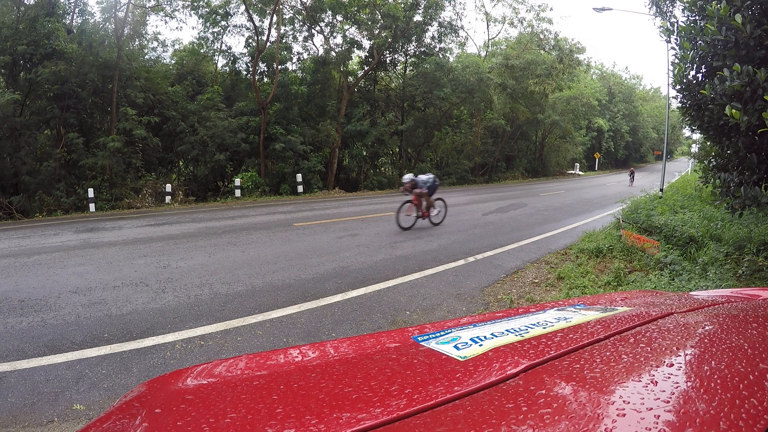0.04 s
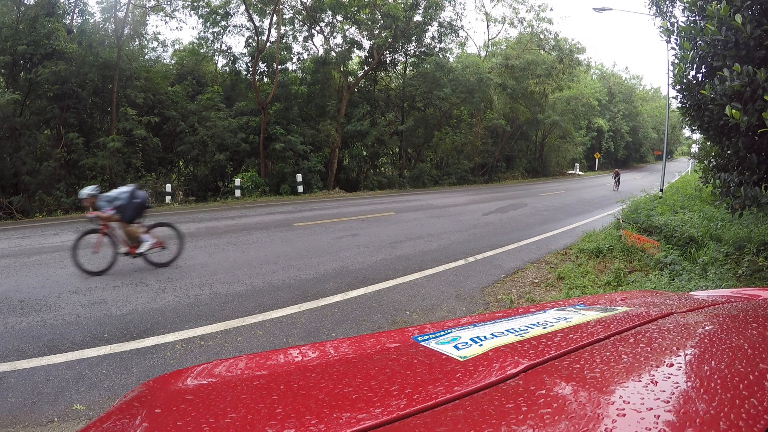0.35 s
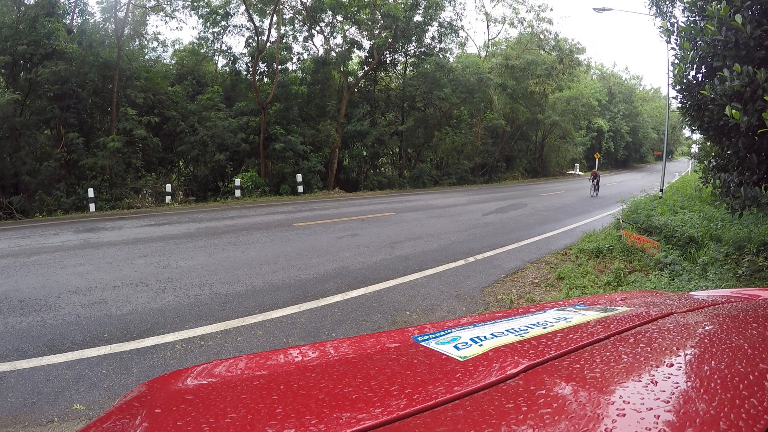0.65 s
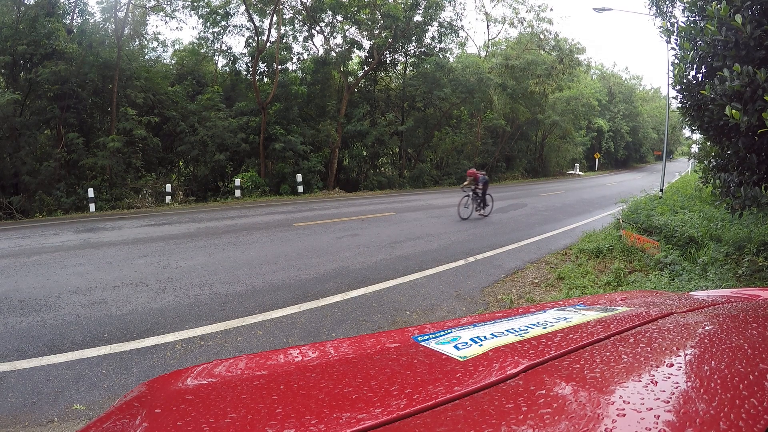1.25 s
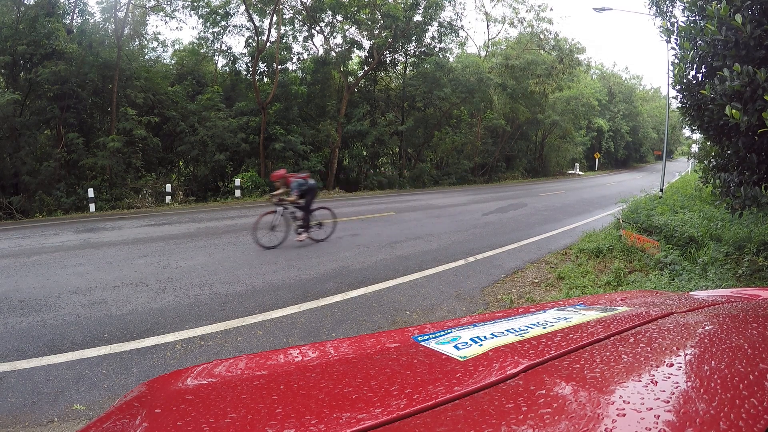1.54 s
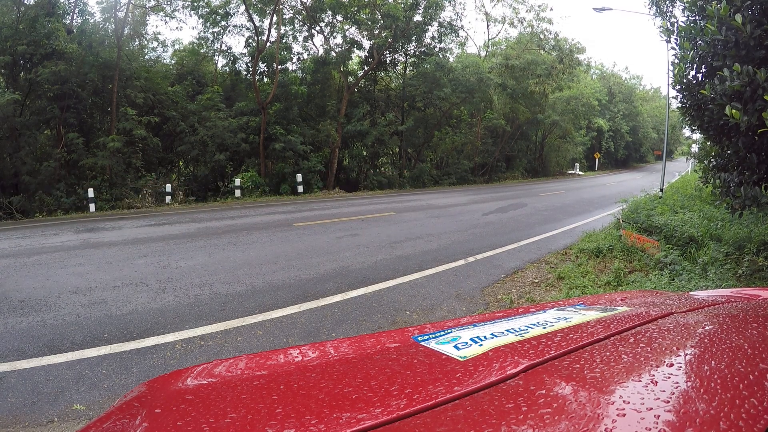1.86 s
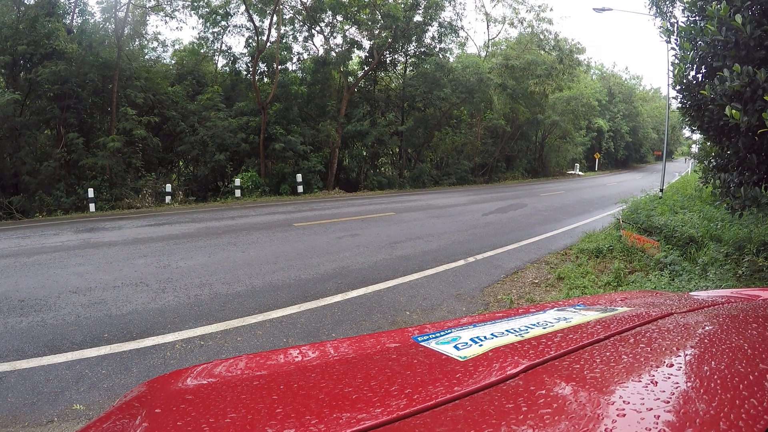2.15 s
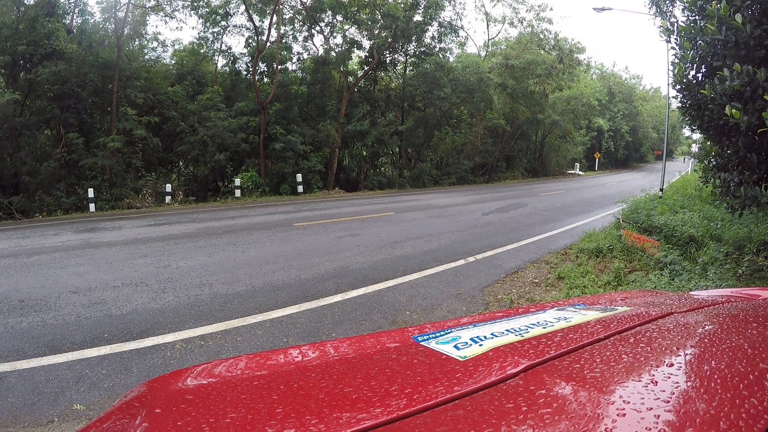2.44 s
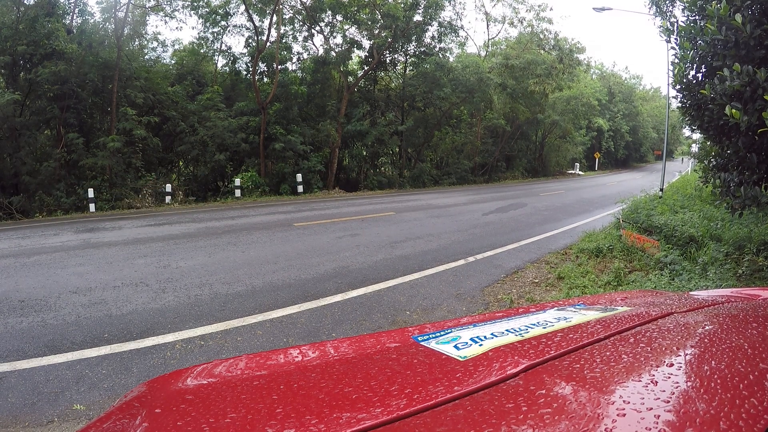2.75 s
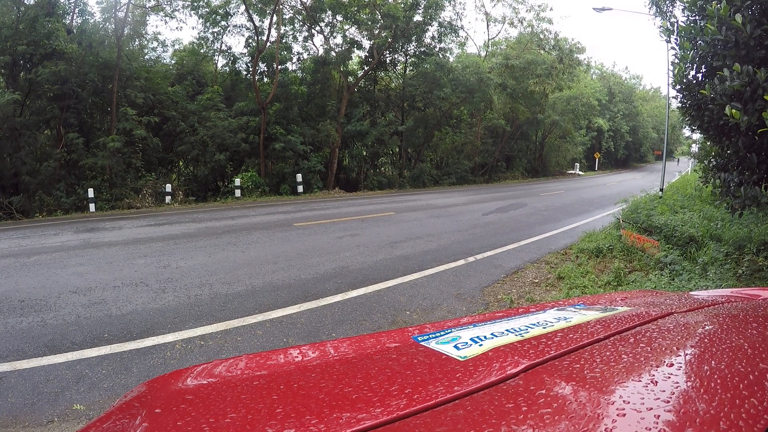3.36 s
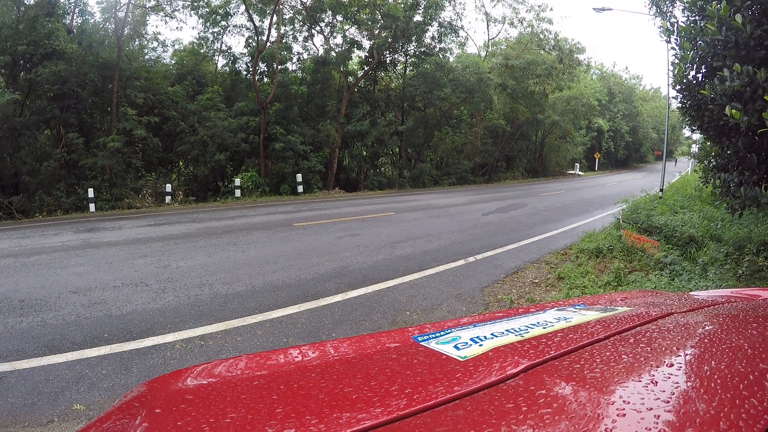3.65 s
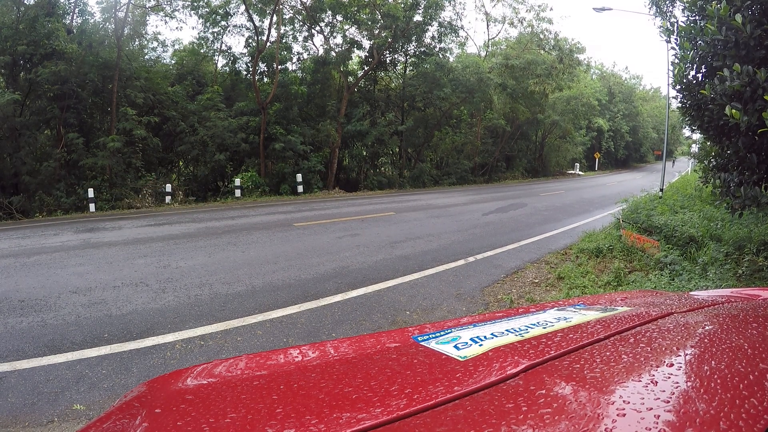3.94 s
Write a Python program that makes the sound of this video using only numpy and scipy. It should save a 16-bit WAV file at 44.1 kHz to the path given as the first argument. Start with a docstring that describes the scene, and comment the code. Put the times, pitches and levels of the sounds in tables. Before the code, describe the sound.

Two bicycles pass close by on a damp forest road, at about 0.5 and 1.9 seconds, each tyre hiss swelling, then fading with a hollow whoosh. High insects drone throughout over a low rumble. Dull bumps sound at the very start and more softly around 2.3 and 2.8 seconds, with a few faint knocks. A small bird chirps faintly near 2.5 and 3 seconds; the insects continue until 4.

```python
"""Two bicycles on a forest road

Two racing bicycles ride past a camera on a parked car, on a damp forest road. Their tyres hiss
on the way in, fizz alongside and roar hollowly as they leave. Insects drone in the trees and a
small bird calls twice. Dull bumps and faint knocks sound over a low rumble."""
import sys
import numpy as np
from scipy import signal
from scipy.fft import rfft, irfft
from scipy.io import wavfile
from scipy.ndimage import uniform_filter1d

SR = 44100
rng = np.random.default_rng(int(sys.argv[2]) if len(sys.argv) > 2 else 0)


def store_wav(level_fs):
    """Save 16-bit WAV to argv[1]."""
    pcm = np.round(np.clip(np.atleast_2d(level_fs), -1, 1) * 32767)
    wavfile.write(sys.argv[1], SR, pcm.T.astype(np.int16))


N = 176400

# Each bicycle's basic tyre noise at its nearest: pitch_hz, level_db_per_hz
FIRST_TYRE_NOISE = [(150, -102), (350, -96.5), (700, -93.5), (1100, -84.5), (1700, -90), (2400, -82.5),
                    (3400, -90), (5000, -93.5), (8000, -103), (10700, -99.5), (12200, -109), (15000, -106)]
SECOND_TYRE_NOISE = [(150, -102), (350, -103), (700, -89.5), (1100, -94.5), (1500, -93), (2400, -87),
                     (3400, -88.5), (5000, -95.5), (8000, -96), (10200, -93), (12000, -99), (13200, -97),
                     (15000, -102)]
# The two rides. An angle is negative on the way in and zero alongside:
# nearest_s, speed_m_per_s, distance_m, band_strength, roar_angle_deg, roar_spread_deg, roar_db
RIDES = [(.53, 13.2, 5.07, 1.18, 28.7, 9.3, 6.5), (1.87, 11.34, 4.15, 1.13, 20, 20.6, 3.5)]
# Tyre bands that stand out in one direction (band_strength multiplies the boost):
# angle_deg, spread_deg, pitch_hz, width_hz, boost_db
TYRE_BANDS = [(-35, 23.5, 3740, 460, 9.5), (-42, 34, 2140, 40, 9), (-27, 33, 2640, 79, 6),
              (56, 7, 1780, 210, 6), (36, 16, 1260, 460, 0), (3, 21, 4960, 200, 8), (5, 18, 6800, 450, 7.5),
              (-26, 6, 9050, 820, 8.5), (-35, 7.7, 12200, 310, 12.5), (4.5, 16, 11720, 550, 10.5),
              (12, 9.8, 10150, 420, 9), (-15, 16, 14000, 900, 4)]
# The insect chorus: pitch_hz, level_db_per_hz
CHORUS_NOISE = [(4500, -118), (4640, -100), (4715, -80), (4760, -91), (4810, -80), (4900, -84.5),
                (5000, -93.5), (5110, -101), (5250, -118)]
# How the chorus swells and sinks: time_s, gain_db
CHORUS_SWELL = [(0, -0.53), (.9, -1), (1.3, 1), (1.6, -1), (2.15, -1.3), (2.4, 0.42), (2.6, -0.78),
                (3.15, 1), (4, -1.2)]
# Thin, steady insect whines: pitch_hz, width_hz, level_db
INSECT_WHINES = [(10405, 1.5, -75), (8538, 90, -88)]
# Bird calls: start_s, length_s, from_hz, to_hz, level_db
BIRD_CALLS = [(2.535, .05, 6150, 7300, -62), (3.03, .11, 7100, 6300, -68)]
# Dull bumps (a fade is the time to drop 60 dB):
# start_s, deep_hz, deep_db, deep_fade_s, upper_hz, upper_db, upper_fade_s
DULL_BUMPS = [(.088, 54.6, -25.5, 0.18, 179, -41.5, 0.13), (0.155, 51.6, -34.5, 0.66, 176, -41.5, 0.12),
              (2.291, 21.96, -40, 2.54, 98, -49, 0.54), (2.809, 24.6, -52.5, 0.99, 99.5, -54, 0.69)]
# Faint hollow knocks: start_s, pitch_hz, level_db
HOLLOW_KNOCKS = [(.105, 556, -48), (.174, 544, -51), (.763, 1820, -43.5), (2.839, 1000, -54.5)]
# The low drone: pitch_hz, level_db_per_hz
DRONE_NOISE = [(60, -100), (110, -90), (145, -76), (165, -83.5), (188, -73.5), (205, -78.5), (230, -94),
               (320, -106)]
# How the drone swells and sinks: time_s, gain_db
DRONE_SWELL = [(.1, 4), (0.398, -1), (.85, 0), (1.048, -8), (1.2, 0.5), (1.38, 2), (1.52, 1.5), (2.0, -3),
               (2.22, -1.5), (2.36, -12), (3.0, -12), (4, -18.5)]
# Still air and far surroundings: pitch_hz, level_db_per_hz
AIR_NOISE = [(10, -75.5), (24, -77), (32, -72), (50, -74.5), (76, -91.5), (100, -86.5), (170, -87),
             (250, -97.5), (450, -99.5), (900, -101), (1800, -101), (3500, -101), (4400, -103),
             (5800, -103), (7000, -107.5), (9000, -110), (11200, -109.5), (12400, -113), (13300, -110.5),
             (15000, -115)]
# Pitches that the camera housing lifts or dulls: pitch_hz, gain_db
HOUSING_COLOUR = [(300, 0.5), (570, 1), (670, -4.5), (780, 2), (910, -2), (1000, 3.5), (1180, -1.5),
                  (1310, 2.5), (1400, -5.5), (1460, -2), (1540, -3.5), (1620, 6), (1750, 6.5), (1870, 3),
                  (2010, 6.5), (2110, 1.5), (2250, 0), (2390, 2), (2520, -0.5), (3000, -4.5), (3300, 2.5),
                  (3500, 0), (3780, 6), (4200, -3.5), (4570, 0.5), (4800, -1), (5350, -2.5), (5800, -9),
                  (6030, -0.5), (6220, -4.5), (6900, -1), (8200, -4), (9500, -2), (15000, -3)]

SOUND_M_PER_S, TOP_HZ = 343, 15250
# Noise is shaped on a grid of pitches and short time steps (frames).
GRID_HZ = np.fft.rfftfreq(1024, 1 / SR)
FRAME_S = np.arange(N // 256 + 5)[:, None] * 256 / SR


def bicycle(tyre_noise, nearest_s, speed, distance, band_strength, roar_angle, roar_spread, roar_db):
    """Gritty tyre noise that is louder when near, drops in pitch as it passes and changes with angle."""
    along_m = speed * (FRAME_S - nearest_s)
    away_m = np.hypot(along_m, distance)
    angle = np.degrees(np.arctan2(along_m, distance))
    # Doppler effect: the pitch the tyres must send for each pitch we hear.
    sent_hz = GRID_HZ * (1 + speed / SOUND_M_PER_S * along_m / away_m)

    def band(towards, spread, hz, width_hz, db):
        """A range of pitches that is louder in one direction."""
        return db * np.exp(-.5 * (((angle - towards) / spread) ** 2 + ((sent_hz - hz) / width_hz) ** 2))

    loss_db = 23.5 + 5.5 * GRID_HZ / TOP_HZ  # per tenfold distance; treble loses more
    level_db = at_pitch(tyre_noise, sent_hz) - np.log10(away_m / distance) * loss_db
    level_db += band_strength * sum(band(*row) for row in TYRE_BANDS)
    level_db += band(roar_angle, roar_spread, hz=1850, width_hz=250, db=roar_db)
    level_db += 1.66 * flicker(frames=14, pitches=9) + 1.87 * flicker(frames=40, pitches=2)
    grit_db = unit_level(uniform_filter1d(rng.standard_normal(N), size=90))
    return shaped_noise(level_db) * gain(grit_db)


def insects():
    """Many far insects merge into one narrow band; single ones whine above it."""
    chorus = shaped_noise(at_pitch(CHORUS_NOISE, GRID_HZ) + at_time(CHORUS_SWELL, FRAME_S))
    whines = sum(np.sqrt(2) * gain(db) * tone(np.full(N, hz), width) for hz, width, db in INSECT_WHINES)
    return chorus + whines


def bird(echo_fade_s=.45, echo_db=-4):
    """Thin gliding calls, smeared by their echo from the trees."""
    calls = np.zeros(N)
    for start_s, length_s, from_hz, to_hz, db in BIRD_CALLS:
        progress = np.linspace(0, 1, round(length_s * SR))
        swell = np.sqrt(abs(np.sin(np.pi * progress)))
        glide_hz = from_hz + (to_hz - from_hz) * progress ** 2
        add(calls, start_s, gain(db) * swell * tone(glide_hz, width_hz=900))
    t = np.arange(SR // 2) / SR
    echo = rng.standard_normal(len(t)) * gain(-60 * t / echo_fade_s)
    return calls + gain(echo_db) * signal.fftconvolve(calls, echo / np.linalg.norm(echo))[:N]


def bumps(rise_cycles=1.7):
    """Soft blows, each with a deep and an upper ring that swell quickly and die away."""
    out, t = np.zeros(N), np.arange(SR) / SR
    for start_s, *rings in DULL_BUMPS:
        for hz, db, fade_s in (rings[:3], rings[3:]):
            loudness = np.minimum(t * hz / rise_cycles, 1) * gain(db - 60 * t / fade_s)
            add(out, start_s, loudness * tone(np.full(len(t), hz), width_hz=.043 * hz))
    return out


def knocks(rise_s=.0046, fade_s=.079):
    """Short, rough rings at middle pitches."""
    out, t = np.zeros(N), np.arange(SR // 4) / SR
    for start_s, hz, db in HOLLOW_KNOCKS:
        loudness = np.minimum(t / rise_s, 1) * gain(db - 60 * t / fade_s)
        add(out, start_s, loudness * tone(np.full(len(t), hz), width_hz=180))
    return out


def drone():
    """A narrow band of low noise that swells and sinks."""
    hum = colour(rng.standard_normal(N), DRONE_NOISE) * np.sqrt(SR / 2)
    return hum * gain(at_time(DRONE_SWELL, np.arange(N) / SR))


def air():
    """The far surroundings blend into a soft hiss and a low rumble."""
    return shaped_noise(at_pitch(AIR_NOISE, GRID_HZ) + .73 * flicker(frames=16, pitches=10))


def gain(db):
    """Turns decibels into a multiplier."""
    return 10 ** (np.asarray(db) / 20)


def unit_level(x):
    """Scales a signal so its typical size (rms) is 1."""
    return x / np.sqrt(np.mean(x ** 2) + 1e-20)


def at_pitch(table, hz):
    """Reads between a table's rows, giving each octave equal room."""
    pitches, levels = np.transpose(table)
    return np.interp(np.log(hz + 1), np.log(pitches + 1), levels)


def at_time(table, time_s):
    """Reads a table's level at the given times."""
    return np.interp(time_s, *np.transpose(table))


def colour(sound, table):
    """Turns each pitch up or down as the table says."""
    return irfft(rfft(sound) * gain(at_pitch(table, np.fft.rfftfreq(N, 1 / SR))), N)


def add(mix, start_s, sound):
    """Mixes a sound in at its start time."""
    part = mix[max(round(start_s * SR), 0):][:len(sound)]
    part += sound[:len(part)]


def flicker(frames, pitches):
    """Random louder and softer patches of the given size on the grid."""
    specks = rng.standard_normal((len(FRAME_S), len(GRID_HZ)))
    streaks = uniform_filter1d(specks, frames, axis=0)
    return unit_level(uniform_filter1d(streaks, pitches, axis=1))


def shaped_noise(db_per_hz):
    """Noise with the given level at each point of the grid."""
    white = rng.standard_normal(N + 2048) * np.sqrt(SR / 2)
    grid = signal.stft(white, nperseg=1024, noverlap=768)[2][:, :len(FRAME_S)]
    return signal.istft(grid * gain(db_per_hz).T, nperseg=1024, noverlap=768)[1][:N]


def tone(hz, width_hz):
    """A tone that wanders around a pitch curve; more width sounds rougher."""
    wander = uniform_filter1d(rng.standard_normal(len(hz)), size=60) * np.sqrt(2 * np.pi * width_hz / SR)
    return np.sin(np.cumsum(2 * np.pi * hz / SR + wander))


def scene():
    """Adds up all the sounds, the same for left and right."""
    bicycles = bicycle(FIRST_TYRE_NOISE, *RIDES[0]) + bicycle(SECOND_TYRE_NOISE, *RIDES[1])
    mono = bicycles + air() + drone() + insects() + bird() + bumps() + knocks()
    return np.array([mono, mono])


def record(dry):
    """The housing colours the sound, which starts after a brief silence; the top treble is cut."""
    silence_s, fade_in_s = .089, .002
    fade_in = np.clip((np.arange(N) / SR - silence_s) / fade_in_s, 0, 1)
    treble_cut = signal.firwin(511, TOP_HZ, window=("kaiser", 9), fs=SR)
    return signal.oaconvolve(colour(dry, HOUSING_COLOUR) * fade_in, treble_cut[None], "same")


dry = scene()
out = record(dry)
store_wav(out)
```